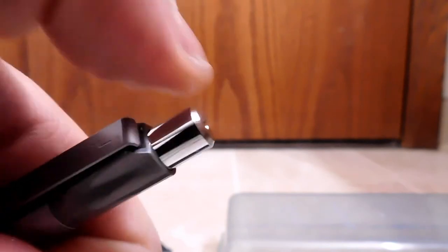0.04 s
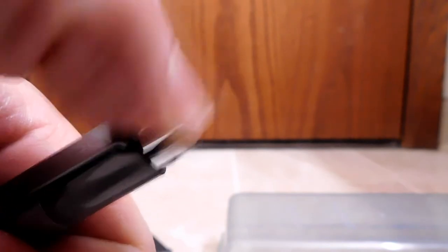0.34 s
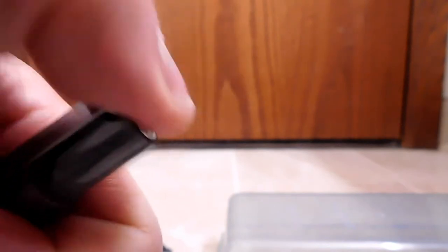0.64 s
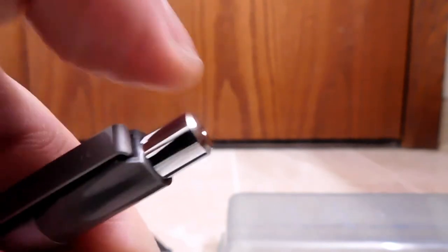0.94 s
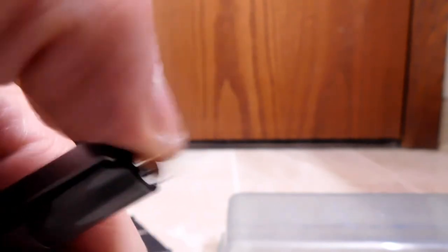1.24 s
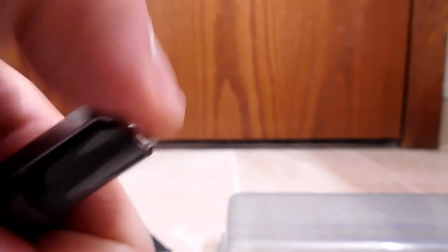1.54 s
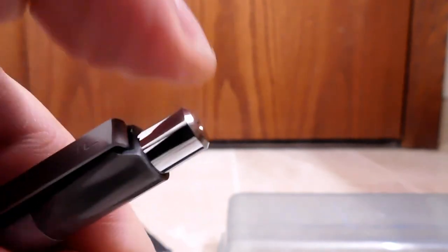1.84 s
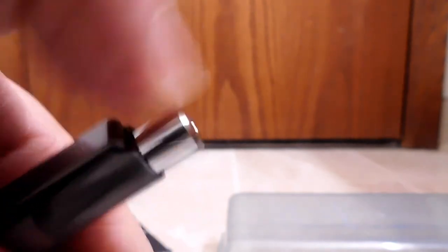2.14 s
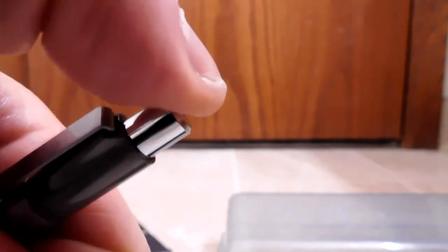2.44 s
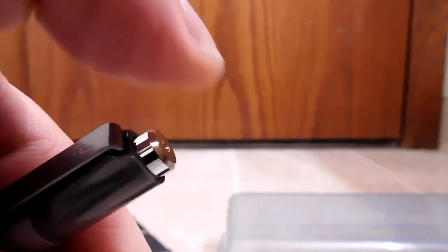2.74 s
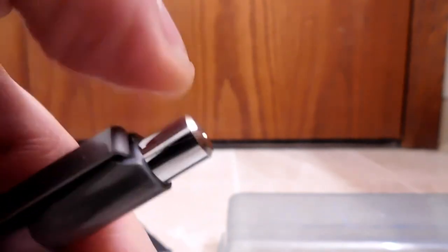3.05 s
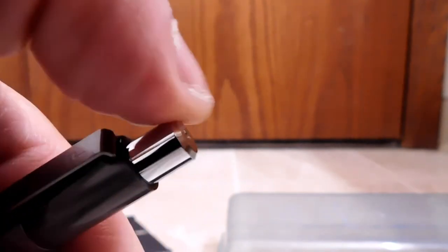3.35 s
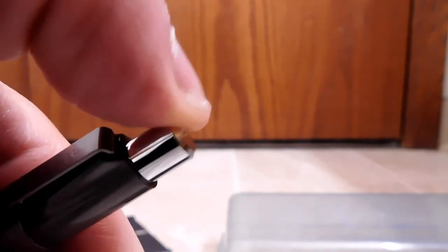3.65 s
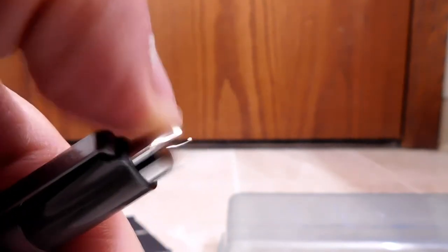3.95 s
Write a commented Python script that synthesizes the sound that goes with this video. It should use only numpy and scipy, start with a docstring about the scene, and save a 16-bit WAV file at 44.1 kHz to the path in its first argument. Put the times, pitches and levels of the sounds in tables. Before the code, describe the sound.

Close to the microphone, a pen clicks in short runs: the latch snaps several times, then the metal button springs back with a tiny rattle. Brief pauses separate the runs, over a small room's faint hush.

```python
"""A pen's metal push button, worked by a thumb close to the microphones in a small quiet room.
In each stroke the button scrapes in its sleeve, the latch snaps several times, and the spring throws
the button back against its stop, which rattles and rings the barrel. The walls answer each click
over a low hush and a faint mains hum."""
import sys
import numpy as np
from scipy import signal
from scipy.fft import rfft, irfft
from scipy.io import wavfile

SR = 44100
rng = np.random.default_rng(int(sys.argv[2]) if len(sys.argv) > 2 else 0)


def wav_record(signal):
    """Record a signal, one row per channel, as 16-bit PCM in the file named by sys.argv[1]."""
    frames = np.transpose(np.atleast_2d(signal))
    bounded = np.clip(frames, -1, 1)
    # unit amplitude maps onto the largest positive 16-bit level
    quanta = np.round(bounded * 32767).astype(np.int16)
    wavfile.write(sys.argv[1], SR, quanta)


N = 176400
CLICK_T = np.arange(4096) / SR


def amp(db):
    """Decibels to gain."""
    return 10 ** (np.asarray(db) / 20)


def unit(x):
    """Scales to an energy of one."""
    return x / np.sqrt(np.sum(x ** 2, -1, keepdims=True) + 1e-20)


def read(points, hz):
    """Reads a table on a log-frequency axis."""
    f, value = np.transpose(points)
    return np.interp(np.log(hz + 1), np.log(f + 1), value)


def colour(x, points):
    """Causal filter with the given spectrum."""
    size = 2 * x.shape[-1]
    log_gain = np.log(amp(read(points, abs(np.fft.fftfreq(size, 1 / SR)))))
    response = np.exp(signal.hilbert(log_gain).conj())[:size // 2 + 1]
    return irfft(rfft(x, size) * response)[..., :size // 2]


def impacts(rise_s, fall_s, shared_below_hz=3980):
    """A short run of tiny impacts, flat in spectrum; the channels share the lows only."""
    envelope = np.minimum(CLICK_T / rise_s, 1) * np.exp(-np.maximum(CLICK_T - rise_s, 0) / fall_s)
    burst = envelope * rng.standard_normal((2, len(CLICK_T)))
    shared = 1 / (1 + (np.fft.rfftfreq(len(CLICK_T), 1 / SR) / shared_below_hz) ** 4)
    for _ in range(3):  # whiten, then restore the decay
        spectrum = rfft(burst)
        spectrum = shared * spectrum[0] + (1 - shared) * spectrum
        burst = irfft(spectrum / (abs(spectrum) + 1e-12)) * np.sqrt(envelope)
    return unit(burst)


def ring(hz, t60_s):
    """One struck mode."""
    return unit(np.cos(2 * np.pi * hz * CLICK_T) * np.exp(-np.log(1000) * CLICK_T / t60_s))


# Each row: mode frequency in Hz, level in dB, T60 in seconds.
BARREL_MODES = [(1010, -26, 0.011), (1270, -16, 0.014), (1510, -17, .012), (1827, -11, 0.01),
                (2232, -14, 0.012), (2690, -15.5, 0.0074), (3030, -11, 0.0075), (3520, -10.5, 0.0064),
                (5150, -10.5, 0.0065), (6030, -14, 0.0076), (6770, -19, 0.0065)]
# Each row: frequency in Hz, drive of a blow in dB.
BLOW_EQ = [(150, -11), (700, -1), (1500, -2), (3500, -2), (7000, -1), (15000, -11)]

def barrel_knock(knock_hz, width_octaves=0.38, focus_db=11, detune=0.024):
    """A blow rings the barrel's modes; the grip favours those near knock_hz."""
    knock = 0
    for hz, db, t60_s in BARREL_MODES:
        nearness = np.exp(-0.5 * (np.log2(hz / knock_hz) / width_octaves) ** 2)
        struck_hz = hz * (1 + detune * rng.standard_normal())
        knock += amp(db + focus_db * (nearness - 1)) * ring(struck_hz, t60_s)
    return colour(knock, BLOW_EQ)


# Each row: start in seconds, rattle in dB, knock in dB, knock centre in Hz, ring in dB, ring in Hz.
STOP_HITS = [(-.009, 4.5, 1, 2140, -8, 2130), (0.8353, -1, -3, 1800, -15, 2224),
             (1.7087, -9.5, -6.5, 2000, -16, 2104), (2.2526, -9, -2, 2180, -26, 1805),
             (3.1342, 3, -3.5, 1680, -10.5, 2213)]
# Each row: frequency in Hz, gain in dB.
RATTLE_EQ = [(100, -11), (400, -9), (1000, -3), (2200, 0.5), (4500, -1), (6500, -3), (8800, 2.5),
             (11000, 3.5), (13000, 1), (16000, -3)]

def button_stop(rattle_db, knock_db, knock_hz, ring_db, ring_hz, ring_t60_s=0.069, split_hz=150):
    """The freed button rattles on its stop and rings in two close modes, undamped by the thumb."""
    rattle = amp(rattle_db) * colour(impacts(rise_s=0.00072, fall_s=0.0017), RATTLE_EQ)
    long_ring = unit(ring(ring_hz, ring_t60_s) - amp(-7.5) * ring(ring_hz + split_hz, ring_t60_s))
    return rattle + amp(knock_db) * barrel_knock(knock_hz) + amp(ring_db) * long_ring


# Direct left, direct right and reflected paths. Each row: frequency in Hz, gain in dB.
LEFT_EQ = [(200, -5), (1200, -5), (2800, -1.5), (5200, 0.5), (8000, -0.5), (11500, 3.5), (15500, 1)]
RIGHT_EQ = [(200, -22.5), (1200, -1), (2800, 2.5), (5200, -6), (8000, -4), (11500, -8), (15500, -5.5)]
WALL_EQ = [(200, -14.5), (1000, -6.5), (2200, -5.5), (3500, -7), (6000, -7.5), (9000, -7), (12000, -5),
           (15500, -9)]
# Each row: frequency in Hz, T60 in seconds.
ROOM_DECAY = [(200, 0.36), (2000, 0.36), (6000, 0.26), (10000, .22), (15000, 0.21)]

def room(sound, beamed=0, wall_s=0.0125, echo_width_s=0.0045, near_fall_s=0.0027, lag_samples=2):
    """Direct path, scatter off the hand, then the walls; less of the beamed sound is reflected."""
    n = SR // 2
    t = np.arange(n) / SR
    hz, frame_s, noise = signal.stft(rng.standard_normal((2, n)), SR, nperseg=256)
    decay = np.exp(-np.log(1000) * frame_s / read(ROOM_DECAY, hz)[:, None])
    tail = signal.istft(noise * decay, SR)[1][:, :n]
    scatter = (amp(-3.5) + amp(11) * np.exp(-t / near_fall_s)) * np.minimum(t / 0.0011, 1)
    walls = amp(3 * np.exp(-((t - wall_s) / echo_width_s) ** 2))  # nearest wall and floor stand out
    tail = colour(unit(tail) * np.where(t < wall_s, scatter, walls), WALL_EQ)
    out = signal.fftconvolve(sound + amp(-4.5) * beamed, tail, axes=1)
    left, right = sound + beamed
    out[0, :len(left)] += colour(left, LEFT_EQ)
    out[1, lag_samples:len(right) + lag_samples] += colour(right, RIGHT_EQ)
    return out


# Each row: frequency in Hz, relative spectral density in dB.
AIR_SPECTRUM = [(12, -43), (20, -11), (59, -3.5), (85, -9), (119, -2.5), (144, -7.5), (171, -5),
                (245, -6.5), (324, -4.5), (382, -5.5), (597, -4.5), (1410, -4), (15500, -23)]
# Each row: frequency in Hz, left-right correlation.
AIR_COHERENCE = [(30, 0.34), (150, 0.04), (500, 0.098), (1500, 0.12), (4000, 0.035), (15000, 0.029)]
# Each row: frequency in Hz, RMS level in dB.
MAINS_HUM = [(58.6, -81.5), (119.5, -81)]

def hush(base_db=-57, left_trim_db=2.3, right_trim_db=2.23):
    """Steady room air with a faint mains hum."""
    hz, t = np.fft.rfftfreq(N, 1 / SR), np.arange(N) / SR
    left, independent = rfft(rng.standard_normal((2, N)))
    correlation = read(AIR_COHERENCE, hz)
    right = correlation * left + np.sqrt(1 - correlation ** 2) * independent
    air = irfft(np.array([left, right]) * amp(read(AIR_SPECTRUM, hz)), N)
    hum = sum(amp(db) * np.sqrt(2) * np.sin(2 * np.pi * (hum_hz * t + rng.random()))
              for hum_hz, db in MAINS_HUM)
    return amp(base_db) * amp([[left_trim_db], [right_trim_db]]) * unit(air) * np.sqrt(N) + hum


# Each row: start in seconds, length in seconds, level in dB.
SLEEVE_SCRAPES = [(0.468, 0.014, -14), (0.818, 0.015, -6), (1.331, 0.0045, -21), (1.335, 0.0032, -14.5),
                  (1.693, 0.0048, -16), (2.1178, 0.0045, -16), (2.1218, 0.0017, -12.5), (2.232, 0.012, -22),
                  (2.244, 0.0056, -11), (2.6388, 0.0038, -9), (3.111, 0.0036, -15), (3.124, 0.0046, -13),
                  (3.84, 0.012, -19)]
# Each row: frequency in Hz, gain in dB.
SCRAPE_EQ = [(200, -10), (1500, -7), (5000, -9.5), (8000, -9.5), (10800, 3), (13000, -3.5), (16000, -1)]

def button_scrape(length_s, level_db, grain_db=8, grain_samples=16, fall_s=0.0003):
    """The metal button slides in its plastic sleeve with a fine grain."""
    noise = rng.standard_normal((2, len(CLICK_T)))
    roughness = np.repeat(rng.standard_normal(len(CLICK_T) // grain_samples), grain_samples)
    envelope = np.exp(-np.maximum(CLICK_T - length_s, 0) / fall_s)
    return amp(level_db) * colour(unit(noise * amp(grain_db * roughness) * envelope), SCRAPE_EQ)


# Each row: start in seconds, crack in dB, thud in relative dB, knock in dB, knock centre in Hz,
# chink in dB, chink centre in Hz.
LATCH_SNAPS = [(.5092, -4.5, -21, -3, 1480, -15, 10600), (0.6089, 0.5, -6, -1.5, 2120, -3.5, 12400),
               (.7120, -4, -26, 1.5, 2230, -4, 11000), (.8310, -4.5, -34, -1.5, 1390, -7, 9600),
               (1.3812, -0.5, -38, 0.5, 2020, -9, 8800), (1.4775, 2, -2.5, -1.5, 1340, -1.5, 10600),
               (1.5767, -0.5, -25, 0.5, 2170, -8.5, 10800), (1.7006, -5.5, -11.5, -6, 1500, -9.5, 12900),
               (2.6885, -0.5, -17, 2.5, 2290, -7.5, 8650), (2.7421, -.5, -7, -2, 1730, -0.5, 10760),
               (3.0125, -5, -21, 0.5, 2700, -8.5, 9550), (3.1304, -2, -32, -10, 1400, -7, 12700)]
# Each row: frequency in Hz, gain in dB.
CRACK_EQ = [(100, -27), (400, 0), (900, -5), (1600, -8), (3200, -0.5), (4500, -4), (6500, -1.5),
            (8700, 1.5), (11000, -2), (13500, -0.5), (16000, -1.5)]

def latch_snap(crack_db, thud_db, knock_db, knock_hz, chink_db, chink_hz):
    """The latch slips: a crack, a thud into the hand, a barrel knock and the button's damped chink."""
    rise_s, fall_s, thud_s, half_band_hz = 0.000545, 0.00066, 0.00059, 1350
    crack = amp(crack_db) * colour(impacts(rise_s, fall_s), CRACK_EQ)
    age = CLICK_T / thud_s
    thud = amp(thud_db - 11.5) * unit(age * (2 - age) * np.exp(-age))
    band = signal.butter(2, [chink_hz - half_band_hz, chink_hz + half_band_hz], "band", fs=SR)
    chink = amp(chink_db) * unit(signal.lfilter(*band, impacts(rise_s, fall_s)))
    return crack + thud + amp(knock_db) * barrel_knock(knock_hz), chink


def scene(lead_s=0.1):
    """Stops, scrapes and snaps in the room, over the hush."""
    lead = round(lead_s * SR)  # the first stop lands just before time zero
    pen = np.zeros((2, lead + N))
    events = [(start_s, room(*latch_snap(*row))) for start_s, *row in LATCH_SNAPS]
    events += [(start_s, room(button_stop(*row))) for start_s, *row in STOP_HITS]
    events += [(start_s, room(button_scrape(*row))) for start_s, *row in SLEEVE_SCRAPES]
    for start_s, sound in events:
        span = pen[:, round((start_s + lead_s) * SR):][:, :sound.shape[1]]
        span += sound[:, :span.shape[1]]
    return pen[:, lead:] + hush()


def record(dry):
    """Steep low-pass on the top treble."""
    cutoff_hz = 15950
    lowpass = signal.firwin(301, cutoff_hz, window=("kaiser", 9), fs=SR)
    return signal.oaconvolve(dry, lowpass[None], "same")


dry = scene()
out = record(dry)
wav_record(out)
```